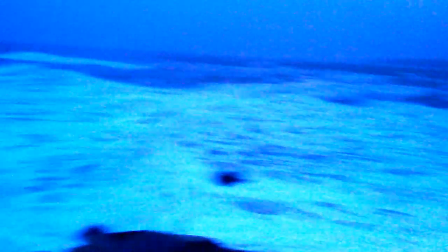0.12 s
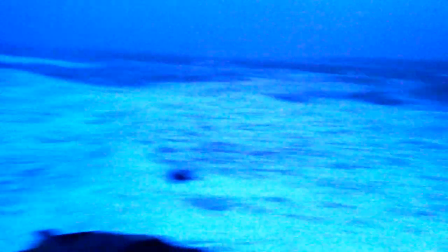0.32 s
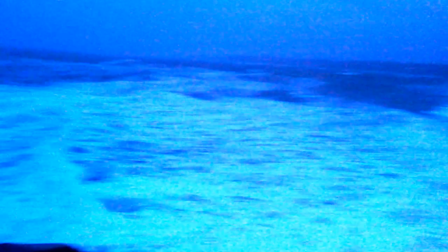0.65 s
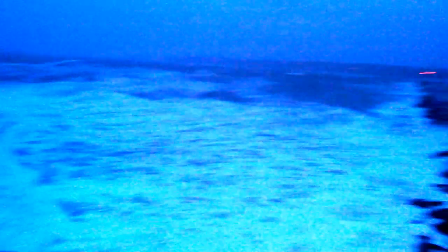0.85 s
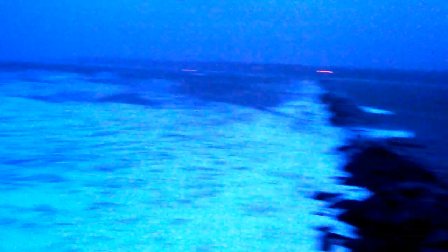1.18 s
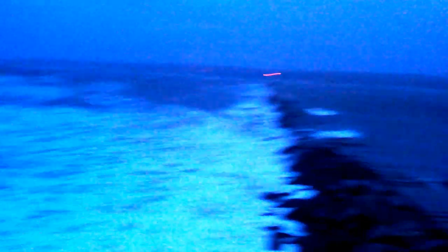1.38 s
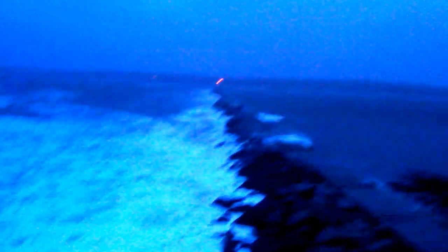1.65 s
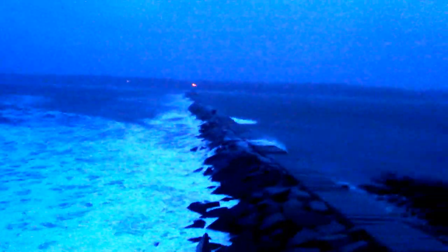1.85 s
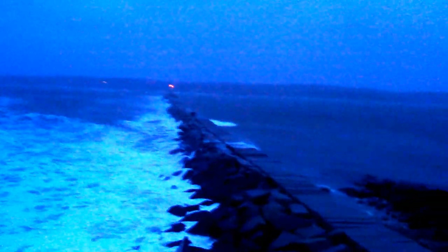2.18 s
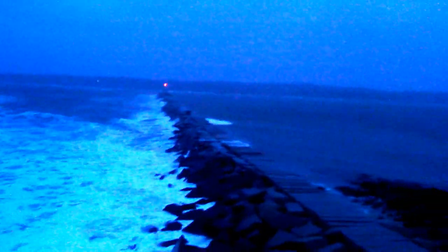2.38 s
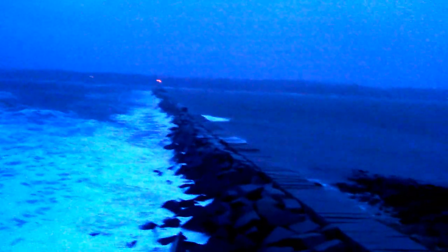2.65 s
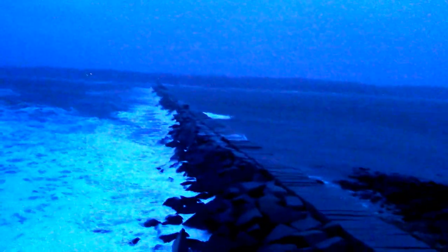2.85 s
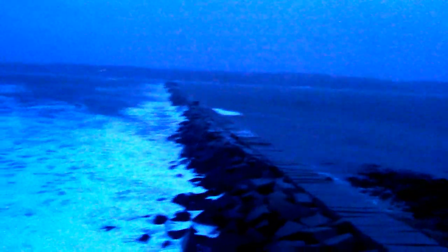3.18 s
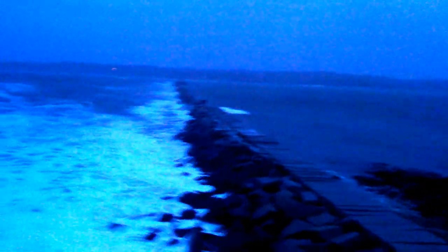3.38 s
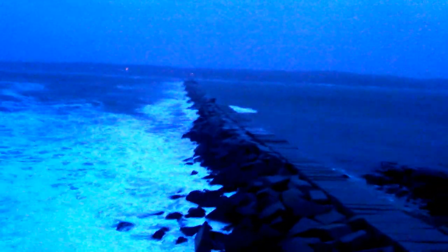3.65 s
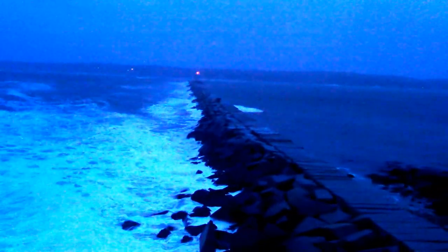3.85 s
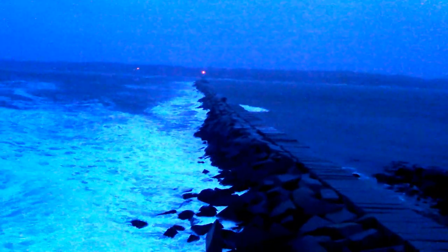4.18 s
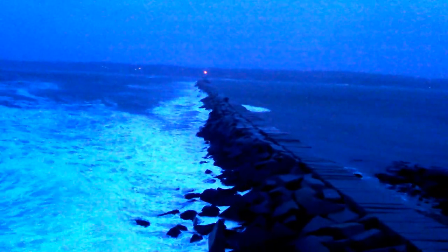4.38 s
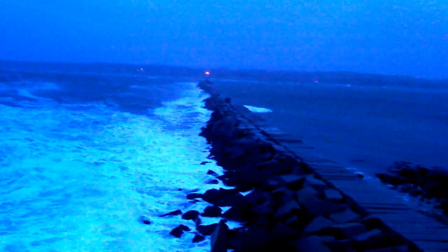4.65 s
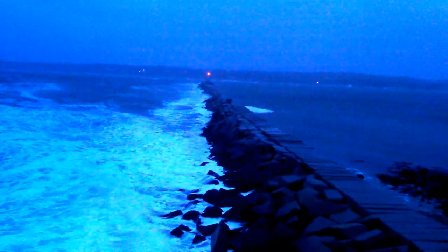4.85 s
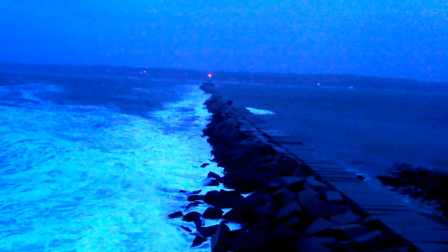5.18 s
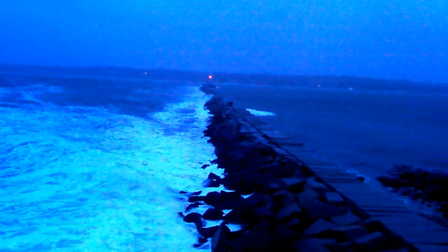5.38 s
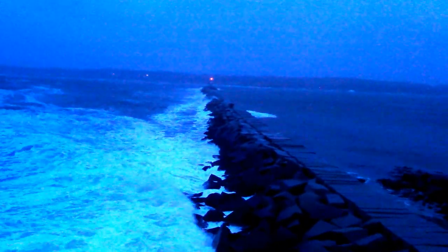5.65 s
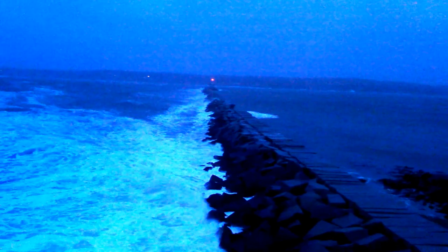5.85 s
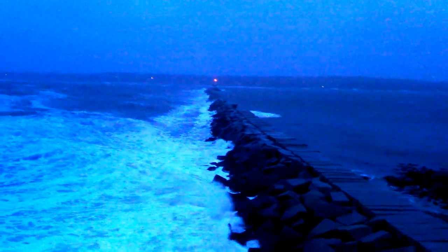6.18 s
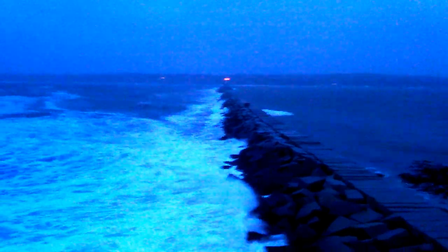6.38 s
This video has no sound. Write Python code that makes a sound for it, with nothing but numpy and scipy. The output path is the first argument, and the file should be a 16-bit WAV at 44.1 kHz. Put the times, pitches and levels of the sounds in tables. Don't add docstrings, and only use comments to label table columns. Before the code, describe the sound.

Strong wind batters a small unshielded stereo microphone on a breakwater: deep thumps, knocks and short roars overload it, shifting between left and right. Behind, storm surf washes over rocks as continuous foamy hiss, ducking after hard gusts and rising in lulls. The buffeting is densest in the first two and a half seconds, then gustier with gaps, swelling again at the end.

```python
import sys
import numpy as np
from scipy import signal
from scipy.fft import rfft, irfft, next_fast_len
from scipy.io import wavfile
from scipy.ndimage import uniform_filter1d

SR = 44100
rng = np.random.default_rng(int(sys.argv[2]) if len(sys.argv) > 2 else 0)


def invert_db(level):
    return 10 ** (np.asarray(level, dtype=float) / 20)


def waveform_to_disk(signal):
    frames = np.transpose(np.atleast_2d(signal))
    scaled = np.clip(frames, -1, 1) * 32767
    samples = np.round(scaled).astype(np.int16)
    wavfile.write(sys.argv[1], SR, samples)


N = 287091

# start_s, level_db
GALE = [(0, -29), (.45, -21.5), (.62, -30), (.85, -27), (1.0, -27.5), (1.45, -25.5), (1.75, -33),
        (2.2, -26.5), (2.8, -33.5), (3.5, -27.5), (3.8, -34), (4.4, -23), (4.63, -29.5), (4.8, -26.5),
        (5.15, -29), (5.65, -24), (5.92, -27.5), (6.51, -20.5)]
GALE_LEFT_SHARE = (0.89, 0.59)
# peak_s, peak_db, half_power_width_ms, roar_over_peak_db
BUFFETS_LEFT = [(.018, -8, 20.4, -37), (.159, -12, 16, -24), (.193, -9, 6.6, -17), (.255, -12, 11, -20),
                (.46, -11.5, 8, -18), (0.495, -10, 18, -18), (.74, -15, 12, -32), (.776, -11.5, 27, -40),
                (1.19, -15.5, 24, -11), (1.242, -15.5, 31, -22), (1.29, -11, 9.2, -31),
                (1.395, -17, 11, -5.5), (1.427, -7.5, 20, -14.5), (1.463, -7, 13, -6), (1.502, -11, 26, -8),
                (1.565, -17, 33, -17), (1.68, -15, 9.9, -8), (1.86, -15.5, 12, -37), (2.029, -8, 22, -15),
                (2.098, -17, 14, -30), (2.158, -8.5, 14, -15), (2.286, -7.5, 16, -18),
                (2.416, -13.5, 18, -14.5), (3.316, -15, 36, -33), (3.471, -11.5, 17, -19),
                (4.156, -12, 21, -23), (4.46, -12, 36, -20), (4.913, -9.5, 22, -22), (4.961, -9.5, 13, -22),
                (5.631, -10, 37, -16)]
# peak_s, peak_db, half_power_width_ms, roar_over_peak_db
BUFFETS_RIGHT = [(.086, -12, 26, -33), (.128, -8.5, 20, -30), (.287, -13, 54, -10.5), (.372, -9, 12, -36),
                 (.428, -12.5, 16, -12), (.532, -13, 5.9, -18), (.559, -13.5, 12, -18),
                 (.875, -13.5, 25, -31), (1.102, -16, 16, -25), (1.74, -14, 13, -23),
                 (2.251, -16.5, 21, -12), (2.505, -11, 7.9, -13), (2.686, -19.5, 41, -13),
                 (3.56, -18, 9, -3.5), (3.607, -14.5, 54, -11.5), (4.198, -16, 14, -34),
                 (4.694, -13.5, 53, -8), (4.767, -21, 21, -33), (4.809, -15, 44, -33),
                 (4.879, -11, 20, -32), (5.404, -23, 26, -1), (5.495, -18.5, 51, -7.5),
                 (5.695, -15, 12, -11), (5.832, -13, 33, -27), (5.861, -12, 18, -4.5),
                 (6.064, -20, 82, -7.5), (6.201, -20, 45, -20), (6.281, -20, 12, -18),
                 (6.328, -14, 25, -20), (6.498, -8.7, 28, -19)]
BUFFET_LEFT_SHARE = (0.74, 0.067)
# frequency_hz, density_db
THUMP = [(20, -47), (35, -24), (55, 5), (90, 5), (120, 0), (200, -36), (400, -70), (2000, -120)]
# frequency_hz, density_db
KNOCK = [(60, -15), (105, -7), (130, 0), (170, -1.5), (300, -11), (600, -35), (1200, -74), (4000, -110)]
# frequency_hz, density_db
ROAR = [(100, -28), (250, 3.5), (450, 1), (800, -16), (1500, -36), (3000, -56), (8000, -100)]


def wind():
    t = np.arange(N) / SR
    left_share = np.linspace(*GALE_LEFT_SHARE, N)
    gale_power = invert_db(2 * (curve(GALE, t)[0] + 2.5))
    steady = gale_power * np.array([left_share, 1 - left_share])
    thump_power = 1.84 * steady
    knock_power = 0.74 * steady
    roar_power = steady * invert_db(2 * -22)

    buffets = [(*row, BUFFET_LEFT_SHARE[0]) for row in BUFFETS_LEFT]
    buffets += [(*row, BUFFET_LEFT_SHARE[1]) for row in BUFFETS_RIGHT]
    buffets += puffs()
    deep_parts = np.clip(0.7 + 0.19 * rng.standard_normal(len(buffets)), 0, 1)
    for (peak_s, peak_db, width_ms, roar_db, share), deep in zip(buffets, deep_parts):
        near = slice(max(round((peak_s - .1) * SR), 0), round((peak_s + .1) * SR))
        widths_away = (t[near] - peak_s) / (width_ms / 1000)
        bump = invert_db(2 * peak_db) * np.exp(-np.log(16) * widths_away ** 2)
        bump = bump * np.array([[share], [1 - share]])
        thump_power[:, near] += bump * deep
        knock_power[:, near] += bump * (1 - deep)
        roar_power[:, near] += bump * invert_db(2 * (roar_db + 0.5))

    thump = np.sqrt(thump_power) * eddies(THUMP, firm=0.82, span=590, alike=0.33)
    knock = np.sqrt(knock_power) * eddies(KNOCK, firm=0.82, span=180, alike=0.38)
    roar = np.sqrt(roar_power) * eddies(ROAR, firm=0.14, span=330, alike=0.3)
    return invert_db(1.69) * (thump + knock + roar)


def puffs():
    every_s, over_gale_db, spread_db, width_ms, roar_db = .07, 7.5, 5.5, 10.2, -19.5
    at, size, length, share = rng.random((round(N / SR / every_s), 4)).T
    peak_s = (np.arange(len(at)) + at) * every_s
    peak_db = curve(GALE, peak_s)[0] + over_gale_db + spread_db * (2 * size - 1)
    roar = np.full(len(at), roar_db)
    return np.transpose([peak_s, peak_db, width_ms * (.5 + length), roar, share]).tolist()


def eddies(spectrum, firm, span, alike):
    own = rng.standard_normal((3, N))
    mixed = np.sqrt(1 - alike) * own[:2] + np.sqrt(alike) * own[2]
    noise = evened(colour(mixed, spectrum))
    power = uniform_filter1d(uniform_filter1d(noise ** 2, span), span)
    return evened(noise / (abs(power) + .02) ** (firm / 2))


# start_s, peak_db, rise_ms
SNAPS_LEFT = [(0.19, -11, 0.31), (0.262, -25, 0.14), (1.201, -27, 0.2), (1.396, -6.5, 0.26),
              (1.465, -16, 0.37), (1.496, -15, 0.3), (1.564, -21, 0.22), (1.675, -39, 0.28),
              (1.854, -30, 0.21), (2.019, -21, 0.23), (2.036, -29, 0.17), (2.051, -9, 0.53),
              (2.152, -18, 0.33), (2.279, -11, 0.41), (2.406, -33, 0.24), (2.428, -37, 0.23),
              (2.675, -34, 0.18), (3.615, -26, 0.18), (4.706, -27, 0.2), (4.91, -36, 0.12),
              (5.628, -17, 0.29)]
# start_s, peak_db, rise_ms
SNAPS_RIGHT = [
    (0.133, -25, 0.2),
    (0.368, -33, 0.2),
    (0.516, -27, 0.18),
    (1.987, -31, 0.16),
    (2.172, -15, 0.46),
    (2.181, -9, 0.51),
    (2.504, -45, 0.13),
    (2.686, -19, 0.2),
    (5.859, -8.5, 0.25),
]


def snaps():
    out = np.zeros((2, N))
    for port, rows in enumerate((SNAPS_LEFT, SNAPS_RIGHT)):
        for start_s, peak_db, rise_ms in rows:
            u = np.arange(600) / SR / (rise_ms / 1000)
            swing = 2 * u ** 3 * np.exp(-u) * (1 - u / 4)
            part = out[port, round((start_s + .001) * SR):][:len(swing)]
            part += invert_db(peak_db + 3) * swing[:len(part)]
    return out


# start_s, surf_hiss_level_db
GAIN = [(0.0, -45), (0.2, -48.5), (0.47, -51.5), (1.38, -44), (1.54, -58.5), (1.96, -52.5), (2.45, -53.5),
        (3.28, -45), (3.66, -49.5), (4.0, -43.5), (4.31, -41), (4.8, -44.5), (4.88, -42.5), (5.0, -46.5),
        (5.6, -42), (5.66, -48), (6.47, -40.5), (6.51, -40.5)]
# frequency_hz, density_db
BODY = [(60, -51), (150, 0.5), (350, 3.5), (500, -3), (700, -8), (1200, -17), (2000, -36.5), (4000, -48.5)]
# frequency_hz, density_db
HISS = [(600, -1), (1400, 3), (2070, 4), (3450, -1.5), (4800, -3.5), (6200, -6.5), (9000, -43),
        (14000, -54)]
# frequency_hz, density_db
FIZZ = [(4000, -17.5), (7500, 1), (9000, 0.5), (10300, -3), (11700, -5.5), (13100, -9), (14200, -12),
        (15200, -7.5)]
# frequency_hz, factor
SHARED = [(100, 3.7), (400, 1.98), (900, 0.55), (2000, 0.071), (5000, 0.075), (13000, 0.24)]
# frequency_hz, left_over_right_db
PORT_TILT = [(300, -1), (2000, -1.3), (3500, -2), (6000, 1.5), (7500, -4), (10000, -4.5), (13000, -1.5)]


def surf():
    frames = N // 128 + 5
    hz = np.fft.rfftfreq(512, 1 / SR)[:, None]
    a, b, c, d, patches = rng.standard_normal((frames, len(hz), 5)).T
    patches = evened(uniform_filter1d(uniform_filter1d(patches, 9, 0), 24, 1))
    flicker = evened(uniform_filter1d(rng.standard_normal(frames), 18))
    t = np.arange(frames) * 128 / SR

    layers = [(BODY, 12.5), (HISS, 0 * t), (FIZZ, -9 + .5 * t)]
    power = sum(evened(invert_db(read(shape, hz))) ** 2 * invert_db(2 * db) for shape, db in layers)

    same = np.clip(0.46 * read(SHARED, hz), 0, .99)
    late = np.exp(-2j * np.pi * hz * 7.7 / SR)
    left = a + 1j * b
    right = same * late * left + np.sqrt(1 - same ** 2) * (c + 1j * d)
    tilt = invert_db(read(PORT_TILT, hz) / 2)
    z = np.array([left * tilt, right / tilt]) * np.sqrt(power)
    z *= invert_db(curve(GAIN, t)[0] + 0.87 * patches + 0.53 * flicker - 17.5)
    return signal.istft(z, nperseg=512, noverlap=384)[1][:, :N]


def whine():
    t = np.arange(N) / SR
    level_db = -52 + .7 * (curve(GAIN, t)[0] + 45)
    whine_hz = 14208
    return invert_db(level_db) * np.sin(2 * np.pi * whine_hz * t) * np.array([[.15], [1]])


def evened(x):
    return x / np.sqrt(np.mean(abs(x) ** 2) + 1e-20)


def read(points, hz):
    f, value = np.transpose(points)
    return np.interp(np.log(hz + 1), np.log(f + 1), value)


def curve(rows, t):
    s, *columns = np.transpose(rows)
    return [np.interp(t, s, c) for c in columns]


def colour(x, spectrum):
    size = next_fast_len(N, real=True)
    response = invert_db(read(spectrum, np.fft.rfftfreq(size, 1 / SR)))
    return irfft(rfft(x, size) * response, size)[..., :N]


def scene():
    return wind() + snaps() + surf() + whine()


def roll_off(x):
    return signal.sosfilt(signal.butter(12, 15150, fs=SR, output="sos"), x)


# centre_hz, half_width_hz, depth_db
HOLES = [(2756, 110, -20), (5490, 130, -12), (11250, 300, -7)]
# frequency_hz, gain_db
TOP = [(14280, 0), (14460, -5), (14520, -50)]
TOP_SLIPS = [.03, 3.975, 4.65, 4.83, 5.33, 5.58, 6.15, 6.45, 6.49]


def record(dry):
    port_lag, knee = 16, 8
    other = np.pad(dry[::-1], ((0, 0), (port_lag, 0)))[:, :N]
    stereo = (dry - other) * invert_db([[-1.8], [0]])
    loudness = uniform_filter1d(abs(stereo).max(0) ** knee, size=101)
    stereo = stereo / (1 + loudness) ** (1 / knee)

    centre = stereo.mean(0)
    for hz, width, db in HOLES:
        side = stereo - centre
        centre = colour(centre, [(hz - width, 0), (hz, db), (hz + width, 0)])
        stereo = side + centre

    kept = colour(stereo, TOP)
    t = np.arange(N) / SR
    slip = sum(np.exp(-((t - s) / .015) ** 4) for s in TOP_SLIPS)
    kept = kept + slip * (stereo - kept).mean(0)
    return roll_off(np.clip(kept, -1, 1))


dry = scene()
out = record(dry)
waveform_to_disk(out)
```